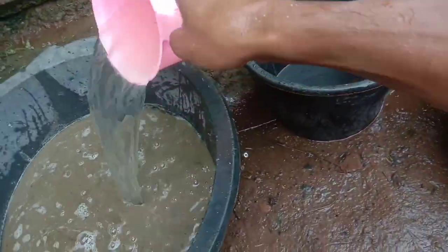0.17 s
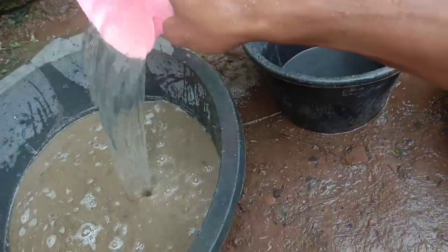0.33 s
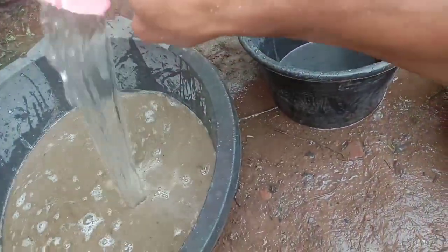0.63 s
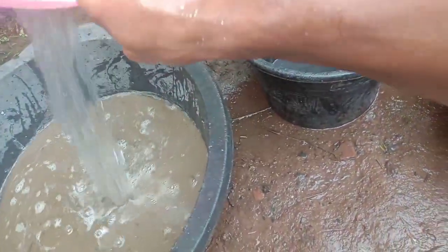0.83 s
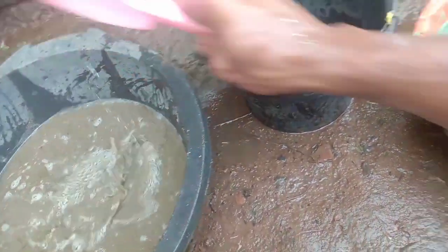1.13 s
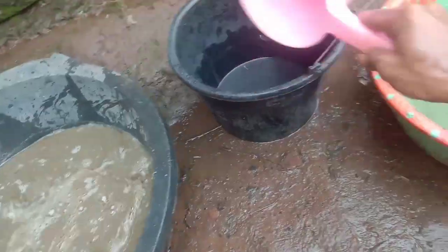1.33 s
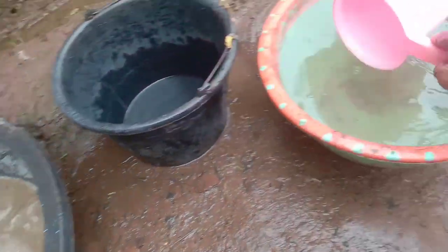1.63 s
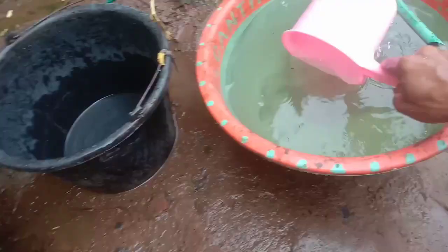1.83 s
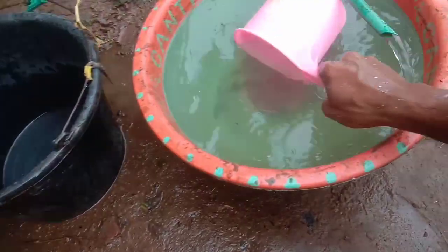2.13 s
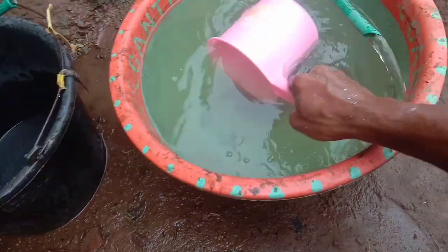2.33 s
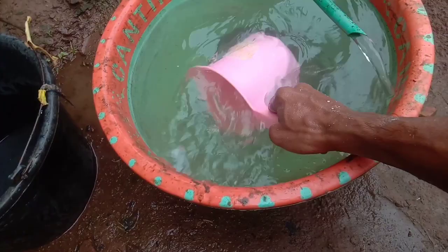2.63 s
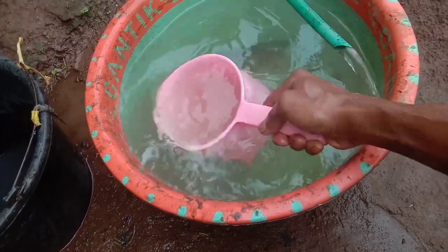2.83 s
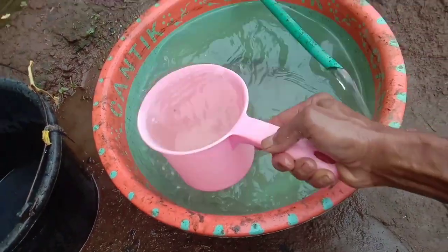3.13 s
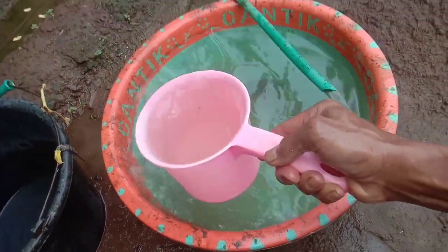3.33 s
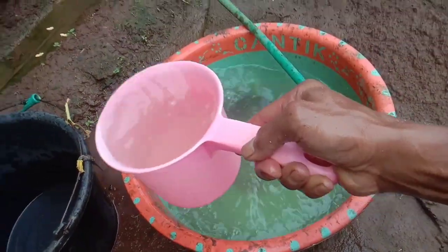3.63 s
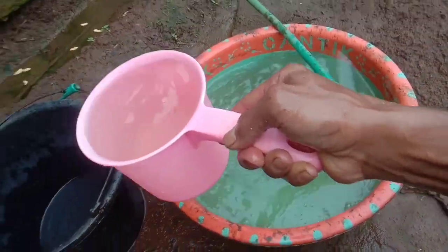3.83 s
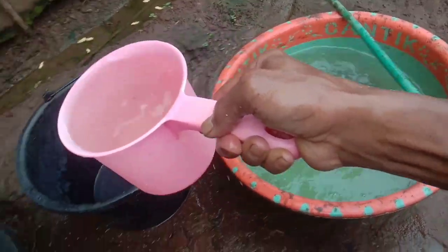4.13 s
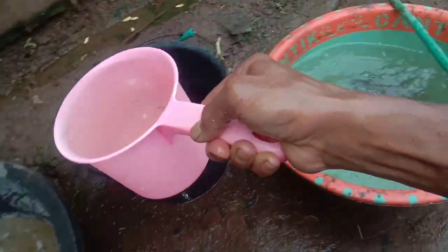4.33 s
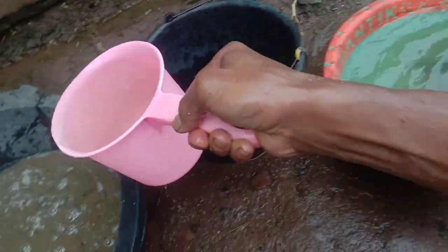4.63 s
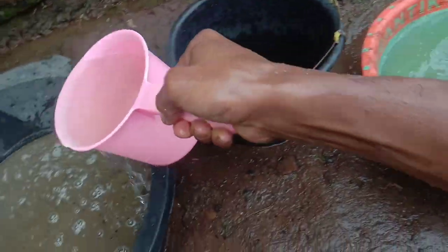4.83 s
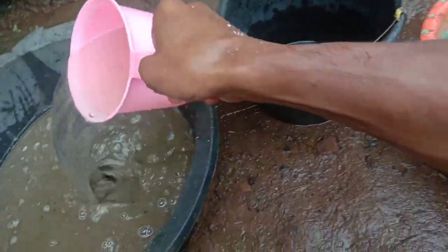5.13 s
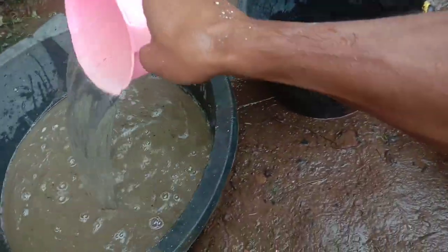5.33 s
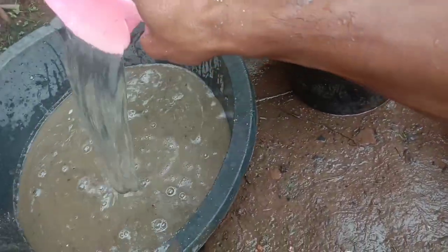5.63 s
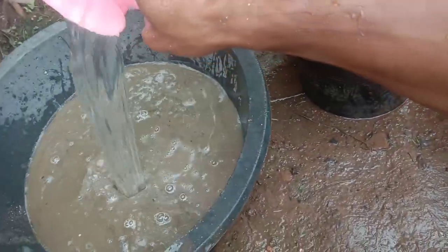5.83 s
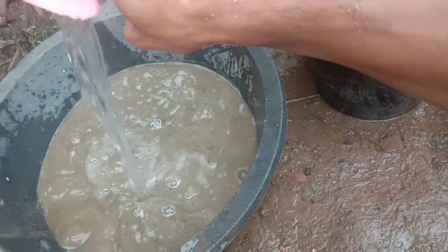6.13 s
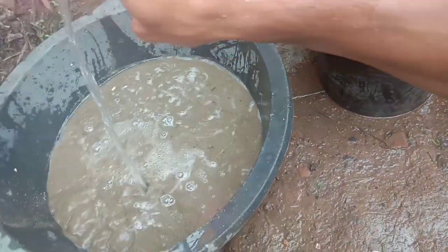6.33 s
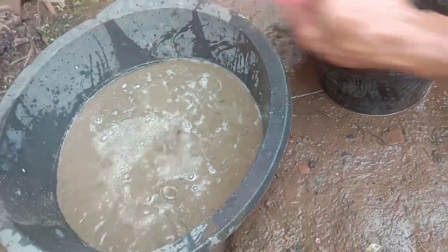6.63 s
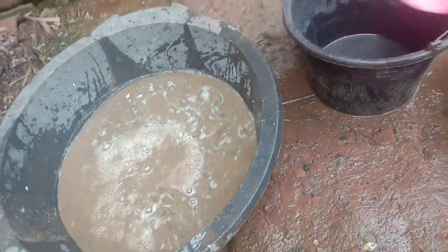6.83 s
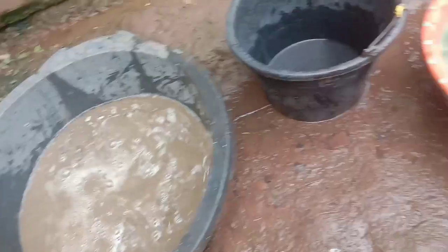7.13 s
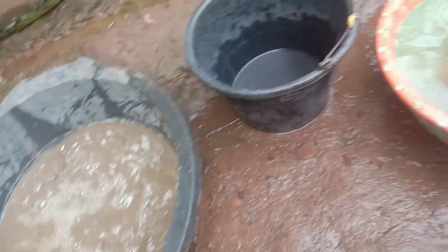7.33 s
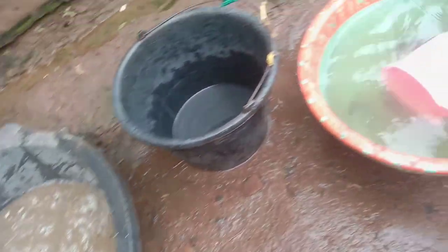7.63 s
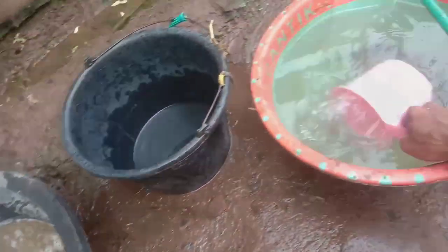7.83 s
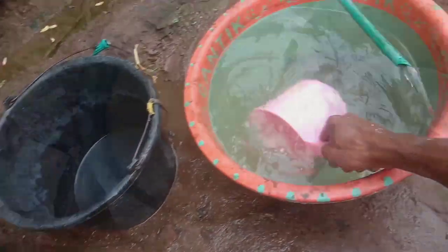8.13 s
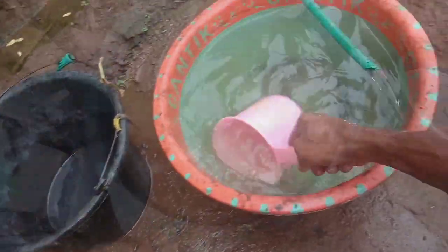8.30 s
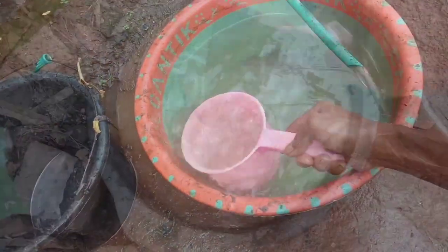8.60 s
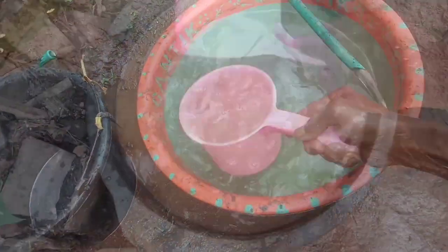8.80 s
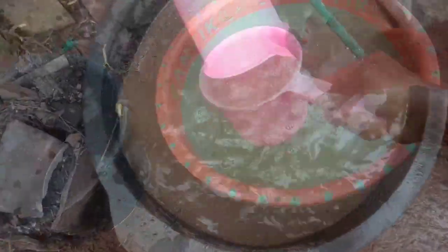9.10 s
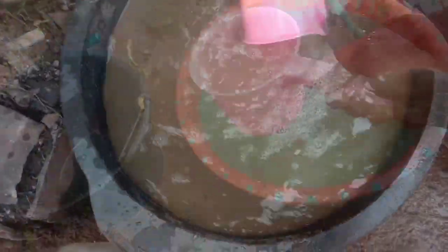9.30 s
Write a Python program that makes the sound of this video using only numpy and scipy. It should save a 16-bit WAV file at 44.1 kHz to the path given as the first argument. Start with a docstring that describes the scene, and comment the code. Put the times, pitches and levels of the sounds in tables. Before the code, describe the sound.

Water pours, gurgles and sloshes in plastic tubs outdoors, over the low drone of a departing motorbike and faint birds.

```python
"""In a yard, water is poured from a plastic scoop into a tub, and the scoop dips into a hose-fed basin.
The stream hisses, fizzes and gurgles as trapped air rings; drops splat, bubbles plop, a bucket hums.
A single-cylinder motorbike, booming with its exhaust pulses, pulls away down the lane, coasts,
pulls again and fades. Small birds chirp far off."""
import sys
import numpy as np
from scipy import signal
from scipy.fft import rfft, irfft
from scipy.io import wavfile

SR = 44100
rng = np.random.default_rng(int(sys.argv[2]) if len(sys.argv) > 2 else 0)


def inscribe(sig):
    """Save sig as 16-bit PCM at rate SR to the path in sys.argv[1].

    A 1-D sig is mono; a 2-D sig holds one channel per row.
    Samples are clipped to [-1, 1] before scaling.
    """
    pcm = np.round(np.clip(np.atleast_2d(sig).T, -1, 1) * 32767)
    wavfile.write(sys.argv[1], SR, pcm.astype(np.int16))


N = 417186
SETTLE_S = 0.28  # how long a move of the hand takes to change the sound

# How the microphone colours splashing water: pitch_hz, gain_db
MIC_COLOUR = [(250, -0.5), (450, -31), (600, -9), (950, -1.5), (1500, 1.5), (2200, 1), (2550, 4),
              (4500, 5.5), (6250, 8.5), (6600, 1), (6950, 7), (7500, 8.5), (8200, -2.5), (11800, -9.5),
              (13800, -13), (15000, 5)]
# The exhaust as heard from the yard: time_s, boom_db, loudest_harmonic, growl_db
EXHAUST_LEVELS = [(0, -26.5, 5.8, -35), (.45, -27.5, 5.1, -33), (.63, -23, 5.8, -31),
                  (1.21, -19.5, 5.6, -30.5), (1.5, -25.5, 6.1, -31.5), (1.76, -23.5, 6.8, -25.5),
                  (1.92, -20.5, 5, -30), (2.11, -19, 5.7, -29.5), (2.21, -21.5, 6, -31.5),
                  (2.42, -23, 5.2, -32.5), (2.66, -20.5, 5.5, -32), (2.97, -24.5, 4.1, -36),
                  (3.35, -22.5, 4.7, -44), (3.56, -19, 4.8, -45.5), (3.79, -26.5, 5.9, -45),
                  (3.9, -27.5, 5.3, -53), (4.3, -26.5, 4.9, -46), (4.87, -30.5, 4.8, -58.5),
                  (5.27, -29.5, 6, -67), (5.43, -27, 5, -43), (5.62, -21, 4.9, -41), (6.03, -24, 4.7, -45),
                  (6.32, -26.5, 5, -47), (6.58, -27.5, 5.1, -55), (6.73, -23, 5.1, -51.5),
                  (7.09, -23, 5.1, -55), (7.37, -25, 5.1, -54.5), (7.5, -27, 5.2, -54),
                  (7.7, -30, 4.4, -48), (7.96, -29.5, 4.2, -49.5), (8.11, -27.5, 4.1, -42),
                  (8.27, -33.5, 4.5, -54), (8.8, -37, 4.8, -52), (9.12, -38, 5.3, -52),
                  (9.27, -35.5, 4.5, -62), (9.46, -32, 3.9, -69)]


def from_db(db):
    """Turn decibels into a gain."""
    return 10 ** (np.asarray(db) / 20)


def rms_one(x):
    """Scale a signal to an average (rms) level of 1."""
    return x / np.sqrt(np.mean(x ** 2) + 1e-20)


def in_time(rows):
    """Join rows of (time_s, values...) with straight lines: one curve per value column."""
    times_s, *columns = np.transpose(rows)
    return [np.interp(np.arange(N) / SR, times_s, column) for column in columns]


def during(start_s, end_s, edge_s):
    """1 between two times and 0 outside, with sloping edges."""
    t = np.arange(N) / SR
    return np.clip(np.minimum(t - start_s, end_s - t) / edge_s + .5, 0, 1)


def drift(rate_hz):
    """A smooth random wobble of typical size 1."""
    pole = np.exp(-80 * np.pi * rate_hz / SR)
    slow = signal.lfilter([1], [1, -2 * pole, pole * pole], rng.standard_normal(N // 40 + 2002))[2000:]
    return np.interp(np.arange(N) / 40, np.arange(len(slow)), rms_one(slow))


def band(x, low_hz, high_hz, order=2):
    """Keep the sound between two pitches."""
    edges_hz = [low_hz, min(high_hz, .45 * SR)]
    return signal.sosfilt(signal.butter(order, edges_hz, "band", fs=SR, output="sos"), x)


def coloured(x, spectrum):
    """Filter by rows of (pitch_hz, gain_db), so that nothing sounds early (minimum phase)."""
    hz, db = np.transpose(spectrum)
    gain_db = np.interp(np.log(np.linspace(1, SR / 2, 2049)), np.log(hz), db)
    cepstrum = irfft(np.log(from_db(gain_db)))
    cepstrum[1:2048] *= 2
    cepstrum[2049:] = 0
    return signal.fftconvolve(x, irfft(np.exp(rfft(cepstrum))))[:N]


def resonance(x, hz, width_hz):
    """Ring at one pitch, with gain 1 at the peak."""
    pole = np.exp(-np.pi * width_hz / SR)
    gain = (1 - pole * pole) / 2
    return signal.lfilter([gain, 0, -gain], [1, -2 * pole * np.cos(2 * np.pi * hz / SR), pole * pole], x)


def glide(length_s, from_hz, to_hz, softness):
    """A short sliding tone; more softness gives gentler ends."""
    size = round(length_s * SR)
    phase = 2 * np.pi * np.cumsum(np.linspace(from_hz, to_hz, size)) / SR
    return np.hanning(size) ** softness * np.sin(phase)


def add(out, start_s, sound):
    """Mix a short sound in at its start time."""
    at = round(start_s * SR)
    out[at:at + len(sound)] += sound[:N - at]


def bubble_swarm(per_s, low_hz, high_hz, cycles, spread_db, clump_db, pitches):
    """Bubbles form in random clumps; each rings and dies by 60 dB over the given cycles."""
    sizes = from_db(spread_db * np.minimum(rng.exponential(1, N), 5)) * rng.choice([-1, 1], N)
    born = rng.random(N) < per_s * from_db(clump_db * drift(14)) / SR
    which_pitch, out = rng.integers(0, pitches, N), 0
    for k, hz in enumerate(np.geomspace(low_hz, high_hz, pitches)):
        pole, step = from_db(-60 * hz / (cycles * SR)), 2 * np.pi * hz / SR
        clicks = sizes * born * (which_pitch == k) + 1e-18
        ringing = [1, -2 * pole * np.cos(step), pole * pole]
        out = out + signal.lfilter([0, np.sin(step) * np.sqrt(hz)], ringing, clicks)
    return rms_one(out)


def broken_share():
    """The scoop breaks the water up: 0 is smooth hiss, 1 is all separate bubbles."""
    # The scoop pours, drains or dips: start_s, end_s, broken_share
    handling = [(-.1, 1.117, 0.89), (2.333, 3.6, 0.35), (4.877, 6.618, 0.99), (6.76, 7.458, 0.35),
                (7.576, 9.6, 0.69)]
    at_rest = 0.2
    stirred = sum((share - at_rest) * during(start, end, SETTLE_S) for start, end, share in handling)
    return np.clip(at_rest + stirred, 0, 1)


def running_water(bubbling_db, fizz_db, broken):
    """Four sizes of bubble and droplet, from gurgle to spray, each blended with smooth hiss."""
    # The smooth hiss of the hose, thin in the middle: pitch_hz, gain_db
    trickle = [(300, 6), (700, 4.5), (1300, -3), (2800, -15.5), (4500, 20.5), (7000, 23.5), (12000, 20)]
    # Stretches where the low gurgle is louder: start_s, end_s
    gurgly_spans = [(.2, 2.3), (5.05, 7.1)]
    gurgle_db = bubbling_db - 3 + 4 * sum(during(start, end, SETTLE_S) for start, end in gurgly_spans)
    spray_db = -44 + 1.35 * (fizz_db + 31.5)  # spray grows faster than fizz
    surge_db = 1.5 * broken * drift(18)  # as the stream breaks up, all sizes surge together
    hiss = coloured(coloured(rng.standard_normal(N), trickle), MIC_COLOUR)
    gurgle = bubble_swarm(220, 251, 422, cycles=28, spread_db=5, clump_db=5, pitches=8)
    bubbling = bubble_swarm(3000, 613, 2630, cycles=44, spread_db=4, clump_db=3, pitches=18)
    fizz = bubble_swarm(6000, 2590, 9940, cycles=58, spread_db=4.2, clump_db=2.8, pitches=22)
    spray = bubble_swarm(1500, 11100, 16300, cycles=7.1, spread_db=0, clump_db=11, pitches=6)
    layers = [(gurgle, 220, 560, gurgle_db), (bubbling, 550, 2600, bubbling_db),
              (fizz, 2400, 9000, fizz_db), (spray, 8800, 16000, spray_db)]
    out = 0
    for swarm, low_hz, high_hz, db in layers:
        grainy = rms_one(band(coloured(swarm, MIC_COLOUR), low_hz, high_hz, order=3))
        smooth = rms_one(band(hiss, low_hz, high_hz, order=3))
        out = out + from_db(db) * (np.sqrt(broken) * grainy + np.sqrt(1 - broken) * smooth)
    return out * from_db(surge_db)


def droplet_ticks(fizz_db, broken):
    """Small droplets snap at random, more often when the water is broken up."""
    most_per_s, spread_db, fade_s = 110, 2.8, .007
    born = rng.random(N) < most_per_s * broken / SR
    sizes = born * from_db(fizz_db + 0.5 + spread_db * np.minimum(rng.exponential(1, N), 4))
    fades = signal.lfilter([1], [1, -from_db(-60 / (fade_s * SR))], sizes + 1e-18)
    return band(coloured(fades * rng.standard_normal(N), MIC_COLOUR), 3300, 11300)


def tub_and_bucket(x):
    """Tub and empty bucket ring along with the sound; a breeze keeps the bucket's air humming."""
    # The notes of their air and walls: pitch_hz, width_hz, gain_db
    notes = [(970, 40, -8), (1247, 45, 0), (1750, 99, -7.5), (2180, 80, -8)]
    over_bucket = during(2.9, 4.66, SETTLE_S)  # the microphone passes over it and hears it louder
    hum_db = -73.5 + 18 * over_bucket + 2.5 * drift(8)
    hum = from_db(hum_db) * rms_one(resonance(rng.standard_normal(N), notes[1][0], width_hz=34))
    return x + hum + sum(from_db(db) * resonance(x, hz, width_hz) for hz, width_hz, db in notes)


def motorbike():
    """Exhaust pulses make harmonics: tones at whole multiples of the engine's firing rate."""
    # Engine speed, two pulls with a coast after each: time_s, firings_per_s
    speed = [(0, 23.2), (.5, 24.3), (1.5, 24.2), (1.76, 25.6), (2.18, 26), (2.55, 27.7), (3.3, 28),
             (3.82, 28.7), (3.95, 25.5), (4.08, 25.4), (4.35, 28.2), (4.58, 27.5), (4.87, 24), (5.43, 25.2),
             (5.69, 26), (6.11, 27.2), (6.32, 27.6), (6.58, 27.2), (6.73, 27.6), (7.1, 28), (7.37, 28.9),
             (7.5, 28.8), (7.97, 29.8), (8.22, 30.2), (8.8, 26.4), (9.12, 28.7)]
    # The throttle is shut and the engine misfires: start_s, end_s
    coasting = [(3.83, 5.12), (8.28, 9.6)]
    # Tones just below and above the boom: harmonic, offset_db
    side_tones = [(1, -43), (2, -39), (3, -12.5), (8, -3.5), (9, -6), (10, -13.5), (11, -21)]
    # The higher tones of the growl: harmonic, offset_db
    growl_tones = [(12, -13), (13, -13.5), (14, -13), (15, -10.5), (16, -17.5), (17, -18), (18, -22.5),
                   (19, -20), (20, -24), (21, -27)]
    firings_per_s = in_time(speed)[0]
    boom_db, loudest, growl_db = in_time(EXHAUST_LEVELS)
    throttle_shut = sum(during(start, end, edge_s=.2) for start, end in coasting)
    uneven = .025 + (.44 - .025) * throttle_shut
    firing_count = np.cumsum(firings_per_s) / SR + 0.085 * uneven * drift(14.4)  # early or late misfires
    tones = []  # harmonic, level_db, wander_radians
    for k in range(4, 8):  # walls along the lane shift the boom from harmonic to harmonic
        off_peak_db = np.maximum(-5.5 * (k - loudest) ** 2, -12.5)
        tones.append((k, boom_db + off_peak_db + 2.4 * drift(1.8), .3))
    side_db = boom_db + 0.5 + 0.61 * (growl_db - boom_db)
    tones += [(k, side_db + db + 1.8 * drift(2.5), .8) for k, db in side_tones]
    tones += [(k, growl_db + db + 4.5 * drift(12), 1.5) for k, db in growl_tones]
    engine = 0
    for k, db, wander in tones:
        pipe_lag = .18 * (k - 5) ** 2  # the pipe spreads each firing out in time
        phase = 2 * np.pi * k * firing_count - pipe_lag + wander * drift(0.99)
        engine = engine + np.sqrt(2) * from_db(db) * np.cos(phase)
    firings = np.arange(int(firing_count[-1]) + 4)
    strength = np.clip(rng.standard_normal(len(firings)), -1.6, 1.6)  # no two firings are alike
    return engine * (1 + uneven * np.interp(firing_count, firings, strength))


def road_rumble():
    """Noise of exhaust and tyres over a deeper rumble; both partly follow the boom's level."""
    # The tone of that noise: pitch_hz, gain_db
    road_colour = [(40, -81), (70, 2.5), (110, 7), (170, 4.5), (250, -4.5), (400, -46), (700, -49)]
    boom_db = in_time(EXHAUST_LEVELS)[0]
    road = rms_one(coloured(rng.standard_normal(N), road_colour))
    deep = rms_one(band(rng.standard_normal(N), 24, 80))
    road_db = -19.5 + 0.72 * boom_db
    deep_db = -38.5 + 0.59 * boom_db + 2.6 * drift(3)
    return from_db(road_db) * road + from_db(deep_db) * deep


def bubble_plops():
    """A short slap, then a dying tone whose pitch rises as the bubble nears the surface."""
    # Single bubbles, from drips to big gulps of air: start_s, level_db, pitch_hz
    plops = [(0.107, -12.5, 1400), (0.314, -15, 2240), (0.384, -10.5, 298), (0.532, -7, 261),
             (0.661, -8.5, 251), (0.847, -17, 277), (0.948, -21.5, 2330), (0.956, -9, 271),
             (1.049, -15, 294), (1.058, -13, 1240), (1.086, -8.5, 2090), (1.64, -21, 2600),
             (1.655, -18, 540), (1.776, -23, 1870), (2.359, -7.5, 780), (2.36, -10, 1010),
             (2.415, -14, 1340), (2.445, -20, 2000), (2.513, -18.5, 2960), (2.534, -23, 1080),
             (2.78, -20, 1280), (2.796, -14, 730), (2.793, -14.5, 1240), (2.822, -18, 1210),
             (2.857, -9, 1340), (2.905, -17.5, 840), (2.911, -16.5, 3620), (2.95, -18, 684),
             (2.979, -20, 1260), (2.985, -20, 2700), (2.997, -16, 3560), (3.011, -7, 4360),
             (3.014, -17, 1340), (3.016, -18, 4780), (3.025, -10, 4970), (3.049, -23, 1820),
             (3.063, -22, 1710), (3.069, -22, 4250), (3.087, -19, 2150), (3.121, -13, 4780),
             (3.128, -18, 1900), (3.158, -12, 5600), (3.266, -16.5, 2190), (3.267, -17, 2870),
             (3.3, -26, 2520), (3.345, -24, 2640), (3.315, -12, 820), (3.37, -25, 960), (3.391, -20, 1600),
             (3.432, -23, 573), (3.48, -20, 1430), (3.874, -18.5, 2190), (4.869, -10, 626),
             (4.898, -14, 630), (4.968, -10, 1490), (5.072, -11, 1560), (5.09, -17, 950),
             (5.096, -12.5, 302), (5.14, -16, 933), (5.221, -13, 1740), (5.256, -18, 915),
             (5.296, -13.5, 2180), (5.311, -15.5, 285), (5.383, -17.5, 1590), (5.424, -15.5, 308),
             (5.935, -20, 2140), (6.252, -18.5, 1700), (6.342, -21, 1340), (6.456, -16, 816),
             (6.298, -17, 254), (6.466, -6.5, 285), (6.626, -22, 2030), (6.7, -34, 2640),
             (6.762, -36, 1930), (6.987, -31.5, 1730), (7.135, -25.5, 1540), (7.216, -29, 1800),
             (7.363, -36, 980), (7.678, -5.5, 1286), (7.578, -13, 4000), (7.58, -23, 2780),
             (7.88, -22, 1860), (8.3, -24, 1970), (8.325, -23, 1920), (8.49, -30, 1950), (8.76, -20, 4500),
             (8.411, -25.5, 363), (8.506, -15, 350), (8.52, -23, 1460), (8.568, -21.5, 1890),
             (8.603, -19, 1770), (8.644, -30, 875), (8.698, -23, 338), (8.755, -28.5, 750),
             (8.758, -30, 1220), (8.759, -30, 322), (8.911, -22, 2100), (9.02, -39, 890), (9.045, -27, 740),
             (9.115, -33, 1860), (9.135, -33.5, 1270), (9.183, -28, 1240), (9.43, -32, 1800),
             (8.545, -17, 735), (8.601, -15.5, 680), (8.614, -17.5, 278), (8.835, -24, 1330),
             (8.856, -12, 2090), (8.856, -11, 334), (8.885, -16, 350), (8.964, -13.5, 290),
             (8.994, -25, 305), (9.019, -18.5, 314), (9.071, -19.5, 2150), (9.092, -27.5, 477),
             (9.191, -16, 2180), (9.211, -15.5, 1680), (9.33, -31, 1146), (9.342, -24.5, 2220)]
    slap_db, slap_cycles = -12, 7
    rings, slaps, t = np.zeros(N), np.zeros(N), np.arange(round(.25 * SR)) / SR
    noises = rng.standard_normal((len(plops), round(.03 * SR)))
    rises = .14 * rng.uniform(.2, 1.8, len(plops))
    for (start_s, db, hz), rise, noise in zip(plops, rises, noises):
        fade_s = 30 * (hz / 1000) ** .1 / hz  # small bubbles ring for more cycles
        phase = 2 * np.pi * hz * t * (0.96 + rise * np.minimum(t / fade_s, 1))
        attack = 1 - np.exp(-t * hz * 0.4)
        add(rings, start_s, from_db(db - 60 * t / fade_s) * np.sin(phase) * attack)
        slap_fade = from_db(db + slap_db - 60 * t[:len(noise)] * hz / slap_cycles)
        add(slaps, start_s, slap_fade * rms_one(band(noise, .6 * hz, 2.5 * hz, order=1)))
    churn = 1 + .4 * drift(140)  # moving water roughens the ringing
    return rings * churn + slaps


def drop_splats():
    """A drop hits the water: a burst of noise with a faint tail, one small ringing bubble, and spray."""
    # Drops and slaps on the surface: start_s, level_db, pitch_hz, fade_s, spray_offset_db
    drops = [(0.141, -16.5, 5270, 0.0088, -27), (0.399, -20, 5900, 0.028, -16),
             (.466, -23.5, 4430, 0.017, -26), (0.5256, -24.5, 3540, 0.039, -4),
             (0.5968, -22, 5070, 0.029, -24), (0.9498, -15, 6900, 0.0037, -4), (1.045, -39, 5840, 0.016, 8),
             (1.25, -29.5, 6360, 0.013, -20), (1.658, -17.5, 6740, 0.0086, -4),
             (2.359, -14, 2400, 0.014, -21), (2.441, -22.5, 3840, 0.018, -8), (2.565, -30, 4040, 0.01, -20),
             (2.672, -30, 1404, 0.084, -25), (2.783, -24.5, 3430, 0.011, -20),
             (2.845, -23.5, 5760, 0.0091, -24), (2.912, -25, 6320, 0.014, -14),
             (3.015, -28, 4570, 0.027, -22), (3.066, -31, 4070, 0.013, -18), (3.092, -31, 5630, 0.013, -10),
             (3.127, -21, 6750, 0.0041, 5), (3.154, -20.5, 6740, 0.0096, -5), (3.267, -23, 2630, .008, -25),
             (3.317, -22, 2010, .012, -24), (3.37, -29, 2330, .015, -25), (3.393, -39, 2170, .015, -25),
             (3.4022, -22.5, 4870, 0.017, -4), (3.4783, -19, 5870, 0.0052, -12),
             (3.4984, -21.5, 4430, 0.01, -26), (3.5664, -21.5, 5100, 0.012, -23),
             (3.6, -33, 7100, 0.014, -25), (3.839, -45, 9200, 0.019, 12), (3.914, -18.5, 2380, 0.015, -5),
             (3.932, -29, 4700, 0.018, -7), (4.111, -45, 6900, 0.017, -25), (4.261, -45, 7000, .02, -25),
             (4.564, -46, 6370, 0.077, -25), (4.7994, -34.5, 7300, 0.042, -38),
             (4.8662, -30.5, 2030, 0.044, -15), (4.9003, -28.5, 2860, 0.028, -18),
             (4.9194, -26, 6250, 0.015, 5), (5.072, -28, 5500, .015, -15), (5.122, -23, 5030, .02, -18),
             (5.096, -22, 7220, 0.025, 0), (5.1425, -22.5, 2220, 0.041, -17),
             (5.1755, -23.5, 5600, 0.036, -15), (5.2053, -19, 4570, 0.0094, -19),
             (5.235, -18, 4800, .012, -15), (5.258, -17.5, 4600, 0.018, -18),
             (5.263, -19, 3540, 0.028, -22), (5.361, -32, 4070, 0.023, -22),
             (5.433, -25.5, 5000, 0.021, -5), (5.6342, -26.5, 2270, 0.025, -5),
             (5.795, -26.5, 4440, 0.022, -22), (5.9595, -26.5, 4400, 0.036, -24),
             (6.2543, -17.5, 7300, 0.016, 0), (6.339, -25.5, 2190, 0.025, -8),
             (6.467, -12, 7600, 0.0036, 2.5), (6.509, -27, 2700, 0.026, -15),
             (7.0823, -15.5, 6820, 0.012, 0.5), (7.287, -34, 6220, 0.021, -21),
             (7.534, -30, 5700, 0.014, -12), (7.5643, -23.5, 4120, 0.007, -19),
             (7.681, -13.5, 4800, 0.013, -16), (7.7498, -33.5, 6170, .012, -20),
             (7.7967, -32, 7200, 0.012, -20), (7.8545, -30.5, 6200, 0.016, -20),
             (8.185, -27, 8200, .01, -10), (8.2404, -24.5, 2640, 0.0085, -25),
             (8.3165, -36, 5000, .012, -20), (8.415, -31, 7300, .01, -20), (8.464, -32, 5000, .012, -20),
             (8.521, -30, 3200, .015, -20), (8.5465, -27, 3740, .015, -20), (8.705, -30.5, 5100, 0.02, -21),
             (8.6607, -31, 5000, 0.014, -25), (8.747, -29, 7200, 0.027, -32), (8.857, -42, 2020, 0.051, -3),
             (8.963, -33, 2470, 0.04, -4), (9.0167, -32.5, 5640, 0.013, -24),
             (9.212, -25.5, 3060, 0.0075, -31), (9.43, -27.5, 6300, 0.01, -25)]
    body, spray, t = np.zeros(N), np.zeros(N), np.arange(round(.1 * SR)) / SR
    noises = rng.standard_normal((len(drops), len(t)))
    for (start_s, db, hz, fade_s, spray_db), noise in zip(drops, noises):
        fade_s = np.clip(fade_s, .004, .07)
        tail = from_db(-15 - 60 * t / .11)
        shape = (from_db(-60 * t / fade_s) + tail) * (1 - np.exp(-t / .0016))
        burst = rms_one(band(noise, hz * 0.42, hz * 1.49, order=1))
        ring = 0.69 * np.sin(2 * np.pi * hz * t) * from_db(-60 * t / (1.5 * fade_s))
        add(body, start_s, from_db(db) * (burst * shape + ring))
        add(spray, start_s, from_db(db + spray_db - 60 * t / fade_s) * noise)
    treble = band(coloured(spray, MIC_COLOUR), 8800, 16000, order=3)
    filter_gain = np.std(band(coloured(noises.ravel(), MIC_COLOUR), 8800, 16000, order=3))
    return band(coloured(body, MIC_COLOUR), 600, 9700) + treble / filter_gain


def echoes(x):
    """Near surfaces return the sound; the delays wander as hand and microphone move."""
    # Bounces off the tub walls and wet ground: delay_s, gain
    bounces = [(.0009, .25), (.0021, .2), (.0037, .2), (.0064, .2), (.011, .15)]
    samples, returned = np.arange(N), 0
    for delay_s, gain in bounces:
        lag = delay_s * SR * (1 + .12 * drift(1.5))
        returned = returned + gain * np.interp(samples - lag, samples, x)
    return (x + returned) / np.sqrt(1 + sum(gain ** 2 for _, gain in bounces))


def sloshes():
    """Trapped air sings a sliding note that the churning water breaks up."""
    # Hollow notes in the scoop and the tub: start_s, from_hz, to_hz, level_db
    notes = [(.4, 1160, 1210, -25), (.49, 1130, 1120, -41), (.64, 1220, 1260, -26), (.74, 1220, 1180, -33),
             (1.057, 1015, 960, -30.5), (1.14, 993, 1045, -37.5), (1.481, 758, 733, -32.5),
             (2.658, 798, 1070, -23), (3.313, 872, 577, -27), (5.01, 652, 624, -30), (5.07, 897, 1007, -24),
             (5.138, 957, 970, -25), (5.14, 2170, 2180, -28), (5.18, 943, 930, -28),
             (5.224, 917, 943, -19.5), (5.717, 1337, 1054, -24.5), (6.014, 2280, 2190, -22.5),
             (6.42, 1490, 1360, -26.5), (7.095, 775, 770, -37), (7.61, 720, 856, -31),
             (8.531, 730, 733, -43), (8.602, 730, 650, -39)]
    length_s, roughness = 0.0538, 0.46
    out = np.zeros(N)
    for start_s, from_hz, to_hz, db in notes:
        add(out, start_s, from_db(db) * glide(length_s, from_hz, to_hz, softness=0.45))
    return out * (1 - roughness + roughness * drift(240))


def birds():
    """Short, mostly falling whistles, smeared by distance."""
    # Small birds far off: start_s, length_s, from_hz, to_hz, level_db
    chirps = [(3.64, 0.046, 5400, 5300, -38), (3.686, 0.05, 5300, 4950, -41),
              (3.73, 0.028, 3500, 3000, -39), (4.375, 0.04, 5030, 5000, -49),
              (4.424, 0.025, 4950, 4750, -48), (4.46, 0.041, 3400, 3020, -46),
              (4.535, 0.05, 4450, 4420, -51), (4.628, 0.036, 4150, 3900, -48),
              (4.638, 0.046, 5100, 5050, -46), (4.735, 0.06, 3370, 2920, -46),
              (7.644, 0.038, 8500, 8300, -39), (7.854, 0.076, 8400, 8350, -44),
              (7.887, 0.13, 7780, 7800, -45), (8.12, .08, 7700, 7400, -36)]
    out = np.zeros(N)
    for start_s, length_s, from_hz, to_hz, db in chirps:
        add(out, start_s, from_db(db) * glide(length_s, from_hz, to_hz, softness=0.34))
    return out * (.5 + .6 * drift(220))


def scene():
    """Mix water, birds and motorbike, the same on left and right."""
    # How loud the moving water is: time_s, bubbling_db, fizz_db
    flow = [(0, -37, -33.5), (.37, -33.5, -32), (.58, -36, -33), (.8, -35, -30), (1.09, -32, -29),
            (1.13, -46, -39), (1.45, -43, -39), (1.82, -35, -33.5), (2.08, -43.5, -37.5),
            (2.53, -37.5, -33.5), (2.75, -39, -36), (2.88, -40, -38), (3.15, -35.5, -35.5),
            (3.22, -45, -40.5), (3.3, -37.5, -41), (3.4, -35, -36.5), (3.44, -46, -44),
            (3.55, -47.5, -46.5), (3.84, -47, -43), (4.03, -54.5, -52.5), (4.82, -54.5, -46),
            (4.93, -40.5, -33.5), (5.11, -29.5, -28.5), (5.27, -35.5, -28), (5.4, -35.5, -30.5),
            (5.7, -38, -35.5), (6.16, -38, -32.5), (6.4, -39, -33.5), (6.53, -48, -38.5),
            (6.66, -62, -52.5), (6.9, -53.5, -48), (7.09, -47.5, -45), (7.51, -50, -45.5),
            (7.77, -42, -42.5), (8.2, -41.5, -39.5), (8.33, -39, -42.5), (8.44, -45, -41.5),
            (8.6, -42.5, -35.5), (8.72, -47, -43), (8.83, -53, -39.5), (8.88, -39, -39.5),
            (8.97, -53.5, -48), (9.25, -58, -48.5), (9.46, -66, -51.5)]
    bubbling_db, fizz_db = in_time(flow)
    broken = broken_share()
    stream = running_water(bubbling_db, fizz_db, broken) + droplet_ticks(fizz_db, broken)
    around_tub = stream + drop_splats() + echoes(bubble_plops() + birds())
    mix = tub_and_bucket(around_tub) + sloshes() + motorbike() + road_rumble()
    return np.array([mix, mix])


def record(dry):
    """Cut the highest treble steeply."""
    cutoff_hz = 15800
    return signal.sosfilt(signal.cheby2(16, 60, cutoff_hz, fs=SR, output="sos"), dry)


dry = scene()
out = record(dry)
inscribe(out)
```